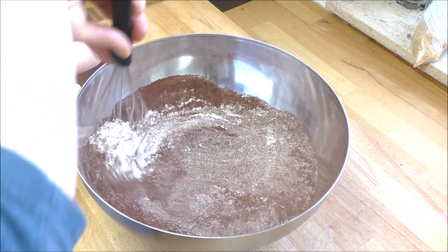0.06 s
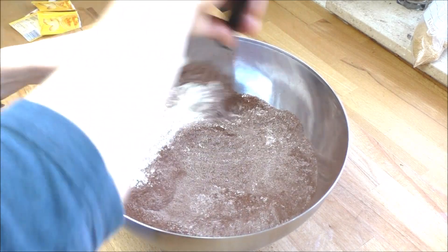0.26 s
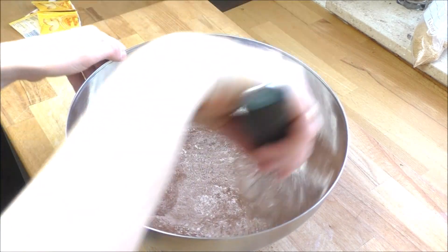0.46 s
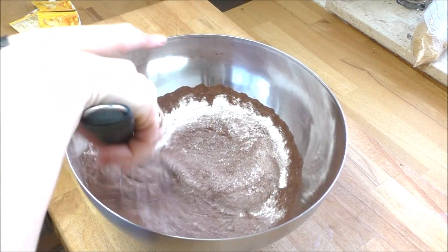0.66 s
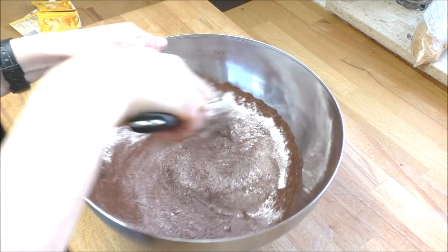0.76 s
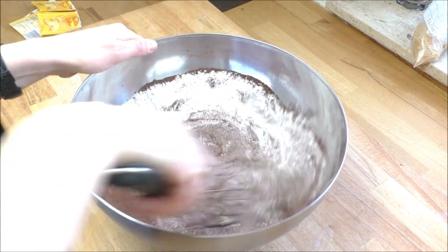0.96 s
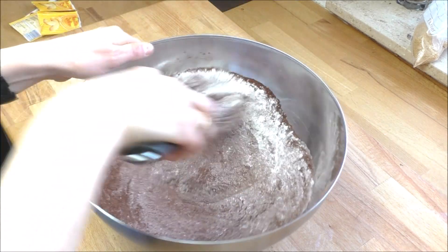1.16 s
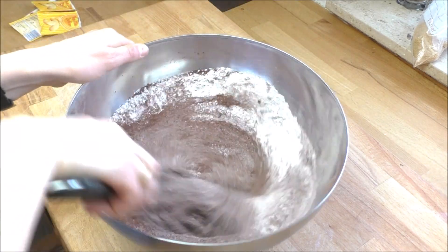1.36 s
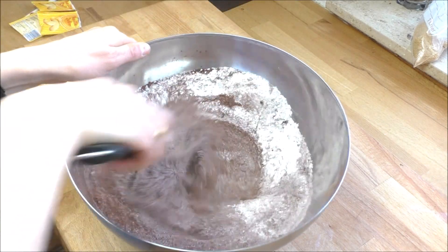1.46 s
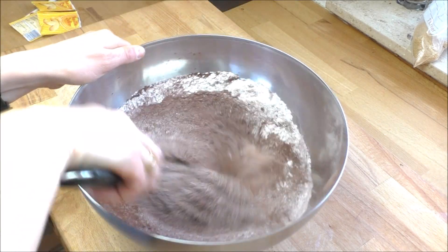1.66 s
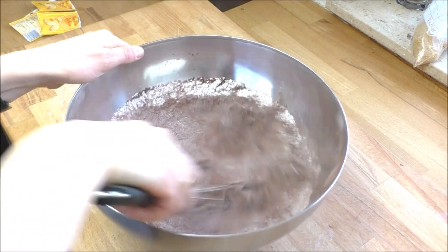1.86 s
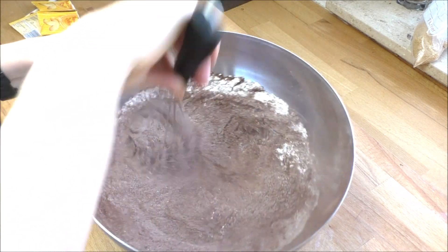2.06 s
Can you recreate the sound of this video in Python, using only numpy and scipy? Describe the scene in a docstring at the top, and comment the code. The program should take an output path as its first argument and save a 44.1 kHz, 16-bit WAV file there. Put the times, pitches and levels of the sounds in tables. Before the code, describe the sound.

Quick whisking of dry powder in a steel bowl, with wires scraping, ticking and clacking.

```python
"""Whisking in a steel bowl.

A wire whisk sweeps flour and cocoa round a bowl on a wooden kitchen counter, heard close by.
The wires stick and slip on the steel, grind through the powder and set the damped bowl droning.
They tick together and clack on the wall, loudest near the end; the bowl bumps the counter."""
import sys
import numpy as np
from scipy import signal
from scipy.fft import rfft, irfft
from scipy.io import wavfile

SR = 44100
rng = np.random.default_rng(int(sys.argv[2]) if len(sys.argv) > 2 else 0)


def transcribe(signal):
    """Save signal, clipped to [-1, 1], as a 16-bit WAV file at the path in sys.argv[1]."""
    frames = np.atleast_2d(signal).T
    limited = np.clip(frames, -1, 1)
    pcm = np.round(limited * 32767).astype(np.int16)
    wavfile.write(sys.argv[1], SR, pcm)


N = 92610

# Levels of the bowl's drone, wires in powder and wires on steel.
# Each row: time in seconds, relative level in dB.
DRONE_LEVEL = [(0, -45), (.2, -35), (.31, -41.5), (.38, -31), (.55, -32.5), (.6, -21), (.72, -27),
               (.79, -25.5), (.9, -21), (.96, -33.5), (1.03, -27), (1.16, -24.5), (1.22, -25), (1.3, -35.5),
               (1.36, -31.5), (1.5, -32.5), (1.58, -31.5), (1.7, -29), (1.81, -29.5), (1.86, -25),
               (1.9, -47), (2.1, -46)]
GRIND_LEVEL = [(0, -56), (.1, -44), (.2, -35.5), (.3, -39.5), (.4, -35.5), (.5, -32), (.545, -35.5),
               (.58, -29.5), (.7, -31), (.79, -23.5), (.82, -30.5), (.84, -30.5), (.9, -32), (.95, -33.5),
               (1.0, -43.5), (1.04, -30), (1.1, -30), (1.17, -21), (1.19, -33), (1.245, -35.5), (1.28, -22),
               (1.31, -26), (1.365, -39.5), (1.45, -35.5), (1.485, -25.5), (1.52, -29), (1.55, -38.5),
               (1.61, -36), (1.665, -20), (1.71, -27), (1.76, -22.5), (1.81, -36), (1.85, -25),
               (1.88, -23.5), (1.91, -36), (1.96, -40), (2.02, -61), (2.1, -63.5)]
SLIDE_LEVEL = [(0, -47), (.07, -45.5), (.13, -36), (.145, -26.5), (.19, -35), (.205, -22.5), (.26, -22.5),
               (.315, -26.5), (.345, -14.5), (.42, -18.5), (.49, -17), (.555, -29), (.59, -19), (.66, -27),
               (.71, -19.5), (.74, -16), (.8, -19.5), (.84, -24), (.875, -24), (.9, -12), (.945, -24.5),
               (.97, -45), (1.01, -34), (1.03, -28), (1.11, -16), (1.168, -13.5), (1.19, -19), (1.235, -27),
               (1.27, -15.5), (1.315, -15.5), (1.375, -31.5), (1.405, -14.5), (1.43, -23.5), (1.47, -18),
               (1.51, -19), (1.565, -40.5), (1.608, -14.5), (1.645, -65), (1.665, -22), (1.7, -13.5),
               (1.755, -14.5), (1.78, -30), (1.825, -22.5), (1.833, -13.5), (1.86, -11.5), (1.89, -32),
               (1.93, -39), (2.0, -50), (2.1, -67)]
# Impacts of bowl on counter, wire on wire and whisk on wall.
# Each row: start in seconds, relative level in dB.
BUMPS = [(.835, -8), (.997, -7.5), (1.128, -13), (1.28, -6.5), (1.585, -9), (1.682, -5.5), (1.839, -12),
         (1.86, -7), (1.92, -2.5), (1.955, -6.5)]
TICKS = [(.139, -18), (.2054, -6), (.3431, -6), (.3721, -8), (.4504, -6), (.7243, -14), (.8803, -1),
         (.8945, 3), (.899, -1), (1.2075, -4), (1.2485, -2), (1.4, -15), (1.508, -9), (1.524, -10),
         (1.6, -15), (1.6611, -12), (1.831, -6), (1.853, -6)]
CLACKS = [(.2014, -22.5), (.29, -24), (.3217, -17.5), (.466, -21), (.653, -25), (1.4825, -20),
          (1.6167, -14.5), (1.626, -14.5), (1.6561, -11), (1.664, -12.5), (1.8685, -2.5), (1.872, -15),
          (1.8872, -3.5)]
# Modes of the counter, powder-damped bowl, bare steel wall and whisk.
# Each row: frequency in Hz, relative level in dB, T60 in seconds.
COUNTER_MODES = [(48.3, 8.5, 0.26), (57, -3, 0.16), (112, 2, 0.11), (153.4, 10.5, 0.18), (213, -8, .06)]
BODY_MODES = [(306, -26, 0.33), (307.2, 5.5, 0.11), (327.4, -8.5, 0.24), (349.7, 3, 0.069),
              (409, -8.5, 0.21), (443, -15, 0.39)]
WALL_MODES = [(980, -25, .25), (1010, -60, .25), (1082, -7, 0.35), (1272, 7.5, 0.83), (1350, -6, 0.1),
              (1900, -7, 0.54), (2070, 25, 0.12), (2760, 20, 0.21), (3000, -3, .5), (2900, 3, 0.3),
              (4070, -19, 0.64), (5250, 16, 0.26), (5900, 5, 0.44), (7040, 14, 0.49)]
WHISK_MODES = [(1274, -5.5, 0.16), (1916, -6, 0.02), (1988, 2.5, 0.042), (2700, -3, 0.093), (2870, 0, .1),
               (3820, -4, 0.11)]
# Spectra of the room and the four contacts. Each row: frequency in Hz, relative density in dB.
HUSH_SPECTRUM = [(20, 6), (50, 2.5), (80, -0.5), (200, -12), (500, -15), (2000, -18.5), (8000, -40),
                 (16000, -99)]
TICK_SPECTRUM = [(500, -26), (3000, -43), (5000, -13), (6300, 4), (7900, 3), (9200, -29), (15000, -26)]
CLACK_SPECTRUM = [(300, -17), (800, -13), (1200, -7.5), (2000, 11), (2400, 3), (2850, 7), (3800, 3),
                  (5000, -10), (15000, -31)]
GRIND_SPECTRUM = [(120, -15), (400, -10.5), (650, 8.5), (820, -0.5), (960, 6), (1500, -1), (2000, -4),
                  (2800, 1), (3400, -4.5), (4800, -1.5), (7000, 2), (10500, -6.5), (12500, -6),
                  (15500, -14.5)]
SLIDE_SPECTRUM = [(500, -56), (1500, -28.5), (3200, -18), (3900, -12), (4400, -17), (5050, -9),
                  (5550, -5.5), (5900, -0.5), (6300, 0), (6600, -1.5), (7000, -3), (7500, -6.5),
                  (8300, -5.5), (9000, -10.5), (10500, -20), (15500, -21.5)]
# Friction tones: low judders, high squeaks.
# Each row: start in seconds, length in seconds, pitch in Hz, relative level in dB.
JUDDERS = [(.082, 0.011, 337, -21.5), (.57, 0.13, 305, -20.5), (.697, .012, 299.2, -23),
           (.785, 0.019, 410, -15), (.79, 0.02, 299.5, -25), (.876, 0.031, 295.4, -19.5),
           (1.12, 0.07, 309, -15.5), (1.517, .016, 343.4, -13.5), (1.625, 0.028, 316, -28),
           (1.68, 0.017, 302, -10.5), (1.76, 0.044, 382.6, -15.5), (1.837, 0.039, 292.7, -9.5),
           (1.916, 0.013, 315.1, -10.5), (1.96, 0.055, 313, -28.5)]
SQUEAKS = [(0.228, 0.027, 2676, -34), (0.334, 0.02, 3810, -26), (.335, 0.057, 5020, -31.5),
           (.337, .018, 6150, -17), (.405, 0.022, 6300, -15), (0.433, 0.048, 5200, -27.5),
           (0.448, 0.015, 2230, -33), (.56, 0.022, 1330, -31.5), (.75, 0.042, 2480, -34),
           (0.772, 0.047, 937, -26.5), (.775, .05, 1325, -31), (.87, 0.037, 942, -29),
           (1.115, 0.024, 3580, -29), (1.2, 0.039, 947, -33), (1.274, 0.029, 668, -33),
           (1.393, 0.025, 4620, -25.5), (1.727, 0.046, 6380, -22.5), (1.73, 0.022, 8150, -29)]

CRUMBS_PER_S, CRUMB_SPREAD_DB = 5000, 3
CHATTER_HZ, CHATTER_DB = 91.16, 1.68  # the wires catch and let go


def undb(db):
    """Decibels to gain."""
    return 10 ** (np.asarray(db) / 20)


def unit_rms(x):
    """Scale to rms 1."""
    return x / np.sqrt(np.mean(x ** 2))


def unit_energy(x):
    """Scale to energy 1."""
    return x / np.linalg.norm(x)


def level_curve(rows):
    """Gain per sample, interpolated in dB."""
    time_s, db = np.array(rows).T
    return undb(np.interp(np.arange(N) / SR, time_s, db))


def through(force, response):
    """Convolve with an impulse response."""
    return signal.fftconvolve(force, response)[:N]


def butter(x, kind, hz):
    """Second-order low- or high-pass."""
    return signal.sosfilt(signal.butter(2, hz, kind, fs=SR, output="sos"), x)


def colour(spectrum):
    """Minimum-phase response of unit energy with the given spectrum."""
    size = 4096
    hz, db = np.array(spectrum).T
    bins_hz = np.maximum(np.arange(size // 2 + 1) * SR / size, 1)
    gain = undb(np.interp(np.log(bins_hz), np.log(hz), db))
    cepstrum = irfft(np.log(gain))
    cepstrum[1:size // 2] *= 2
    cepstrum[size // 2 + 1:] = 0
    return unit_energy(irfft(np.exp(rfft(cepstrum))))


def decay(t60_s):
    """Exponential decay, one second long."""
    return np.exp(-np.log(1000) * np.arange(SR) / SR / t60_s)


def modes(rows):
    """Impulse response of decaying modes."""
    t = np.arange(SR) / SR
    return sum(undb(db) * np.sin(2 * np.pi * hz * t) * decay(t60_s) for hz, db, t60_s in rows)


def impulses(rows):
    """One impulse per impact."""
    force = np.zeros(N)
    for start_s, db in rows:
        force[int(start_s * SR)] += undb(db)
    return force


def rebounds(rows, t60_s):
    """Each impact is a dying burst of tiny random rebounds."""
    burst = decay(t60_s) ** 2
    power = through(impulses(rows) ** 2, burst / burst.sum())
    return np.sqrt(np.maximum(power, 0)) * rng.standard_normal(N)


def slips(per_s, spread_db):
    """Stick-slip impulses of random time, size and sign."""
    size = undb(spread_db * np.clip(rng.standard_normal(N), -2, 2))
    slipping = rng.random(N) < per_s / SR
    return unit_rms(slipping * size * rng.choice([-1, 1], N))


def wander(rate_hz):
    """Smooth random drift, rms 1."""
    return unit_rms(np.interp(np.arange(N) / SR * rate_hz, np.arange(N), rng.standard_normal(N)))


def friction_tones(rows, rise_s, fall_s, jitter_hz, jitter_rate_hz):
    """Brief rough tones; friction jitters their pitch and level."""
    t, out = np.arange(N) / SR, np.zeros(N)
    for start_s, length_s, hz, db in rows:
        attack = np.clip((t - start_s) / rise_s, 0, 1)
        release = np.exp(-np.maximum(t - start_s - length_s + fall_s / 2, 0) / fall_s)
        phase = 2 * np.pi * np.cumsum(hz + jitter_hz * wander(jitter_rate_hz)) / SR
        gain = undb(db + CHATTER_DB * wander(CHATTER_HZ))
        out += gain * attack * release * np.sin(phase)
    return out


def room_hush():
    """The kitchen's steady low noise."""
    return through(rng.standard_normal(N), colour(HUSH_SPECTRUM))


def bowl_body():
    """Low-mode response; the small bowl radiates little below its first mode."""
    return butter(modes(BODY_MODES), "high", hz=234)


def bowl_drone(body):
    """The whisk's drag drives the low modes."""
    drag = slips(CRUMBS_PER_S, CRUMB_SPREAD_DB) * level_curve(DRONE_LEVEL)
    return through(drag, unit_energy(body))


def whisk_judder():
    """Pressed hard, the whisk judders at the bowl's lowest resonances."""
    return friction_tones(JUDDERS, rise_s=0.0071, fall_s=0.0063, jitter_hz=17.91, jitter_rate_hz=120.7)


def counter_bumps(body, contact_s=0.0005):
    """Soft knocks shake bowl and counter."""
    progress = np.arange(SR // 50) / SR / (contact_s / 2)
    push = progress * np.exp(-2 * progress)
    response = undb(-21) * body + undb(-31) * modes(COUNTER_MODES)
    return through(through(impulses(BUMPS), response), push / push.sum())


def steel_wall(crossover_hz=4500):
    """Wall response: direct contact, clear modes and a dense ring whose treble dies first."""
    low = butter(rng.standard_normal(SR), "low", crossover_hz) * decay(t60_s=0.52)
    high = butter(rng.standard_normal(SR), "high", crossover_hz) * decay(t60_s=0.3)
    response = undb(-8.5) * unit_energy(low + high) + undb(-20) * unit_energy(modes(WALL_MODES))
    response[0] += 1
    return unit_energy(response)


def whisk_clacks():
    """The whole whisk rattles on the wall and its wires clank."""
    force = rebounds(CLACKS, t60_s=0.026)
    clack = through(force, colour(CLACK_SPECTRUM))
    clank = through(force, unit_energy(modes(WHISK_MODES)))
    return undb(16.5) * clack + undb(8.5) * clank


def wire_ticks():
    """Single wires strike each other, short and bright."""
    return through(rebounds(TICKS, t60_s=0.0078), colour(TICK_SPECTRUM))


def wire_squeaks():
    """A sliding wire catches and makes one resonance sing."""
    return friction_tones(SQUEAKS, rise_s=0.0088, fall_s=0.0044, jitter_hz=84.8, jitter_rate_hz=400.6)


def moving_contact(scrape, dwell_s=0.05, ring_db=-2.5):
    """The contact travels round the bowl; each spot has its own short resonances."""
    position = np.arange(N) / SR / dwell_s
    out = scrape.copy()
    for spot in range(int(position[-1]) + 2):
        ring = (rng.standard_normal(SR) * decay(t60_s=0.024))[:SR // 20]
        crossfade = np.sqrt(np.maximum(1 - abs(position - spot), 0))
        out += undb(ring_db) * through(scrape * crossfade, unit_energy(ring))
    return out / np.hypot(1, undb(ring_db))


def wire_scrape():
    """Wires chatter over bare steel and grind through the powder."""
    chatter = undb(CHATTER_DB * wander(CHATTER_HZ))
    steel_force = slips(per_s=3500, spread_db=-2) * level_curve(SLIDE_LEVEL) * chatter
    powder_force = slips(CRUMBS_PER_S, CRUMB_SPREAD_DB) * level_curve(GRIND_LEVEL) * chatter
    slide = through(steel_force, colour(SLIDE_SPECTRUM))
    grind = through(powder_force, colour(GRIND_SPECTRUM))
    return undb(-1) * slide + undb(4) * grind


def scene():
    """Mono mix: hush, the bowl's low sounds, and wire contacts ringing through the wall."""
    hush = undb(-42) * room_hush()
    body = bowl_body()
    lows = undb(-1.5) * (bowl_drone(body) + whisk_judder()) + counter_bumps(body)
    wall = steel_wall()
    contacts = whisk_clacks() + undb(10) * wire_ticks() + undb(4) * wire_squeaks()
    contacts += moving_contact(wire_scrape())
    return (hush + lows + through(contacts, wall))[None]


def record(dry):
    """Round the loudest peaks; cut the lowest bass and the top."""
    ceiling, top_hz = 0.86, 15750
    rounded = dry / (1 + (dry / ceiling) ** 6) ** (1 / 6)
    lowpass = signal.ellip(8, 0.05, 50, top_hz, fs=SR, output="sos")
    return signal.sosfiltfilt(lowpass, butter(rounded, "high", hz=22))


dry = scene()
out = record(dry)
transcribe(out)
```